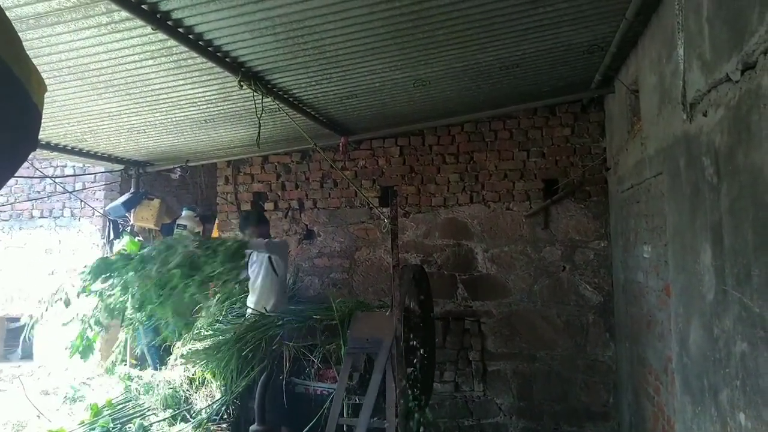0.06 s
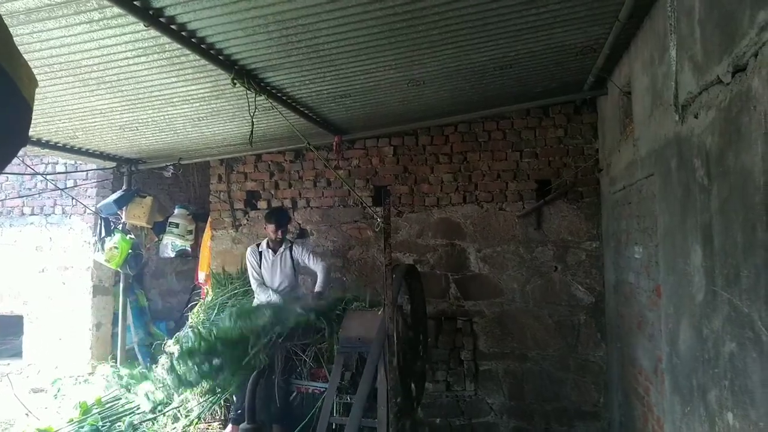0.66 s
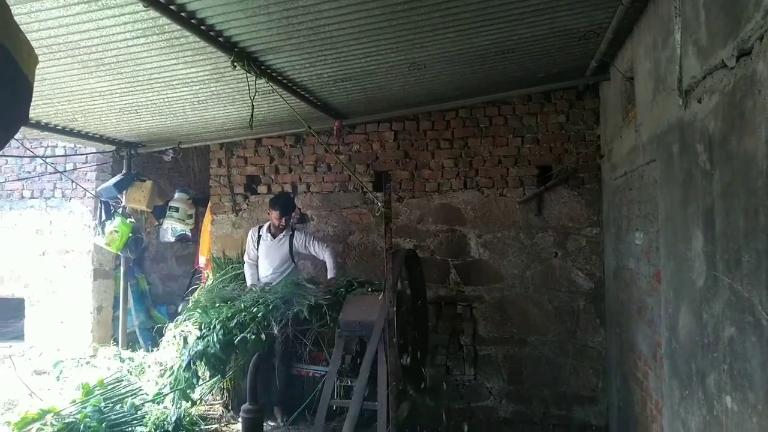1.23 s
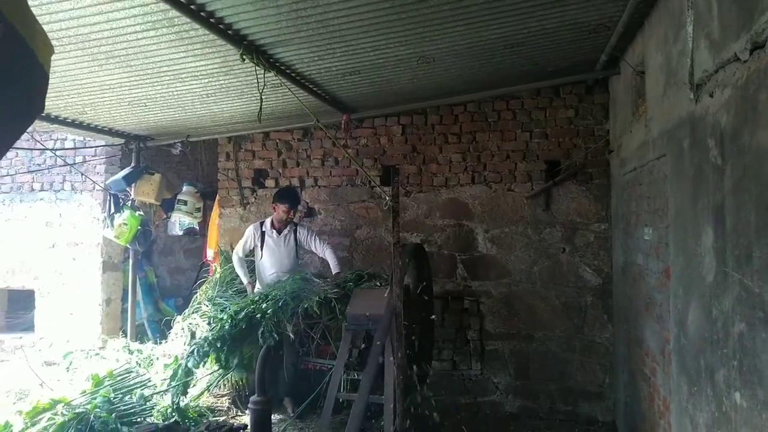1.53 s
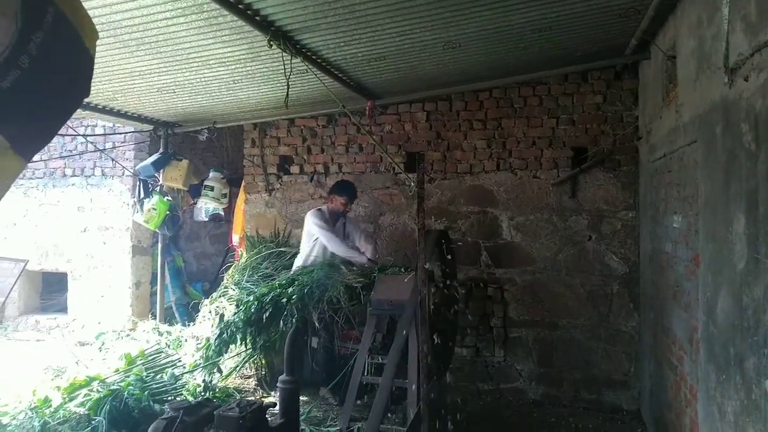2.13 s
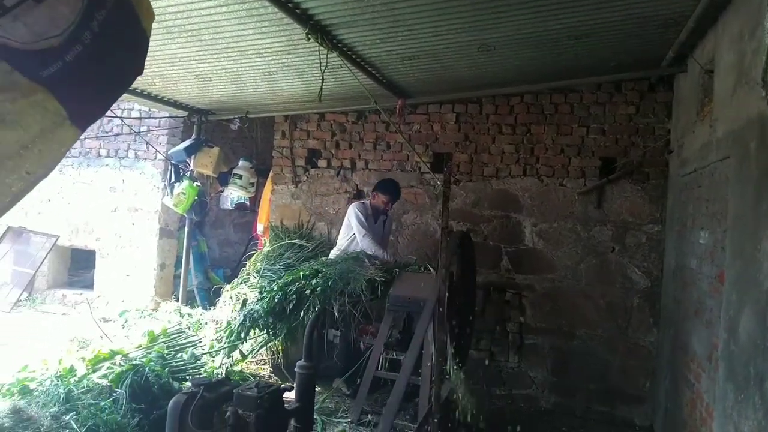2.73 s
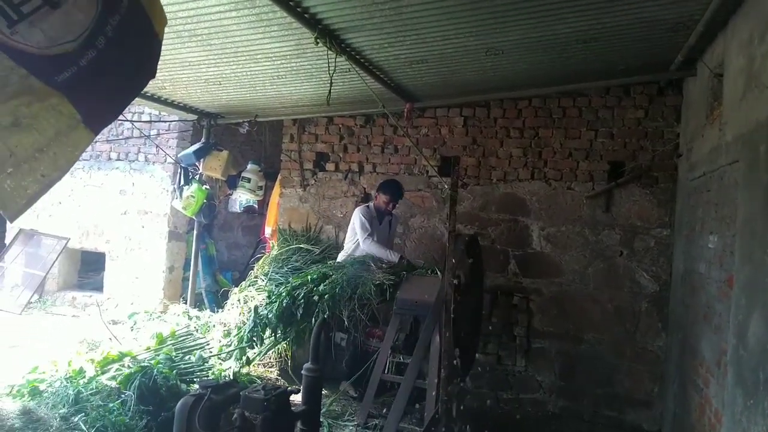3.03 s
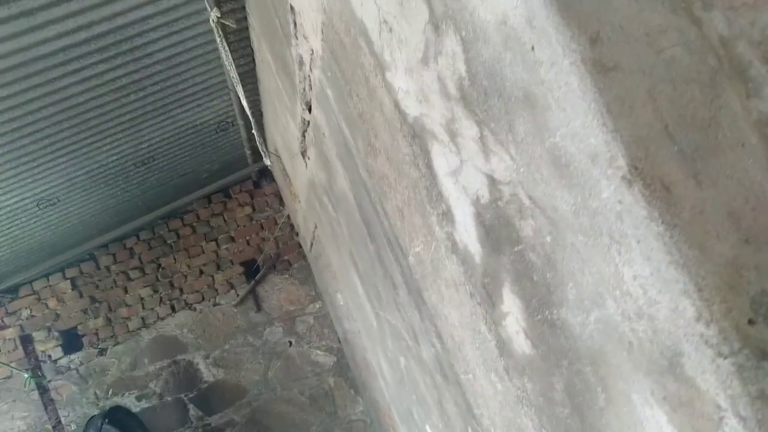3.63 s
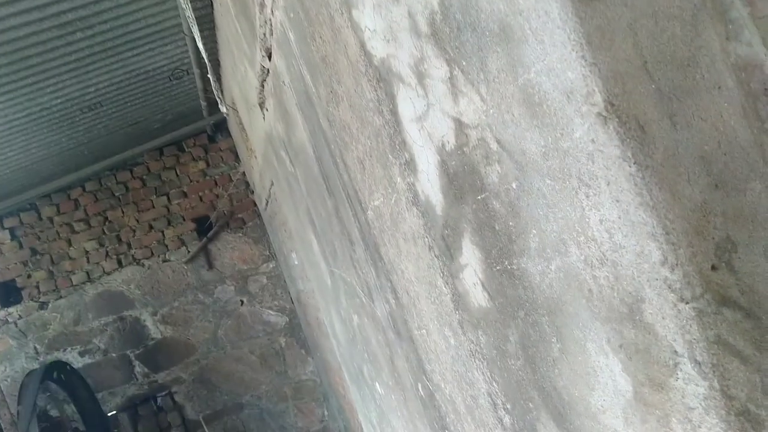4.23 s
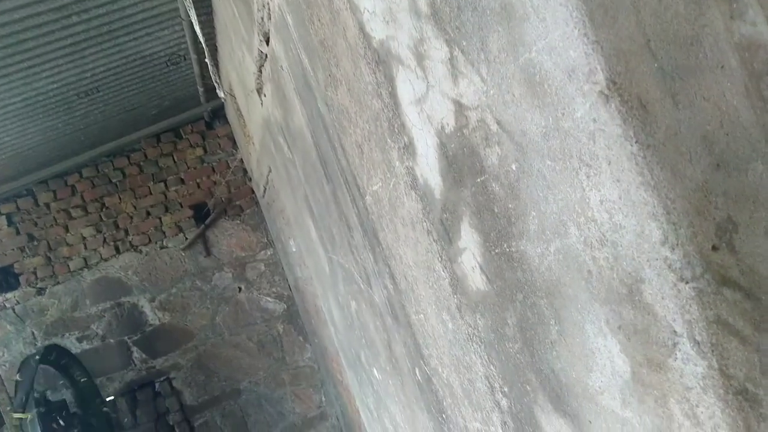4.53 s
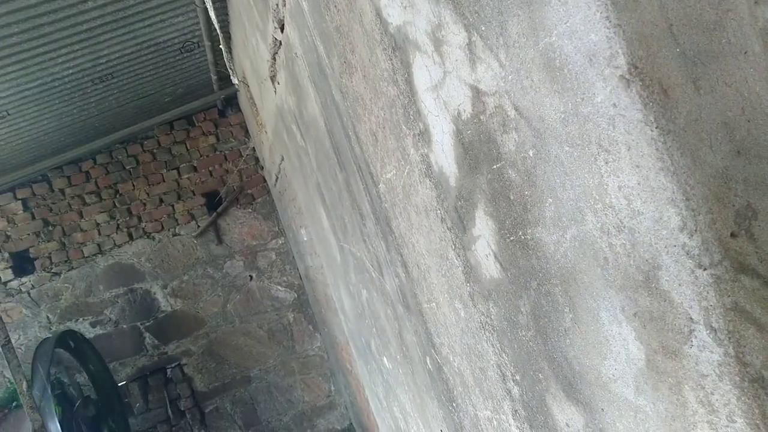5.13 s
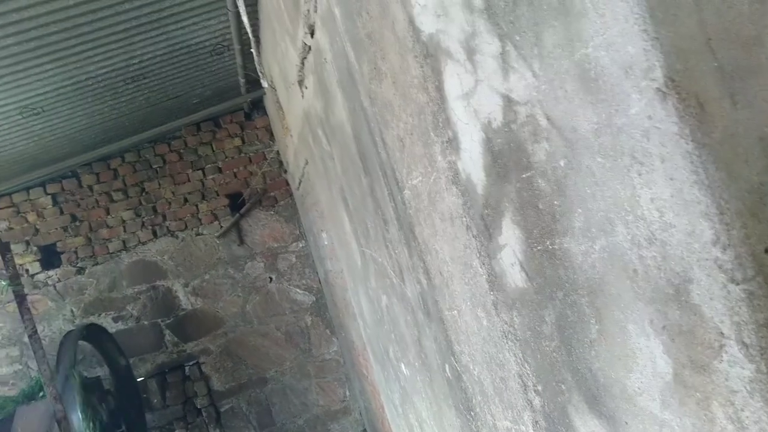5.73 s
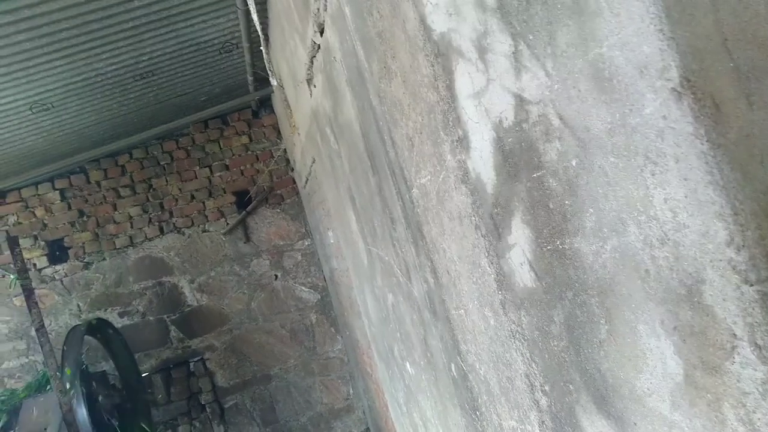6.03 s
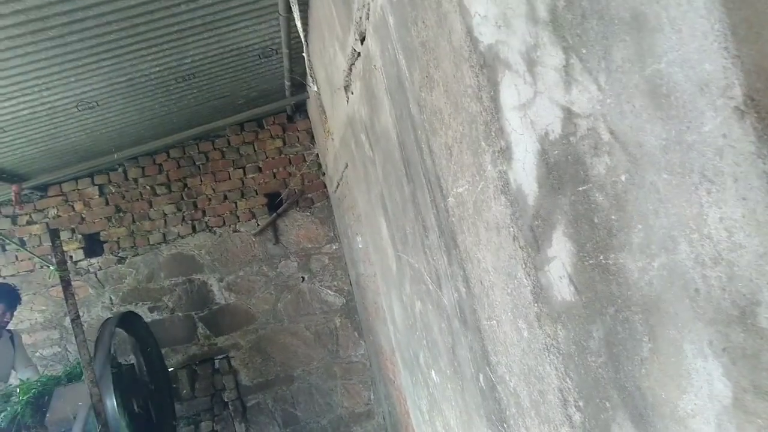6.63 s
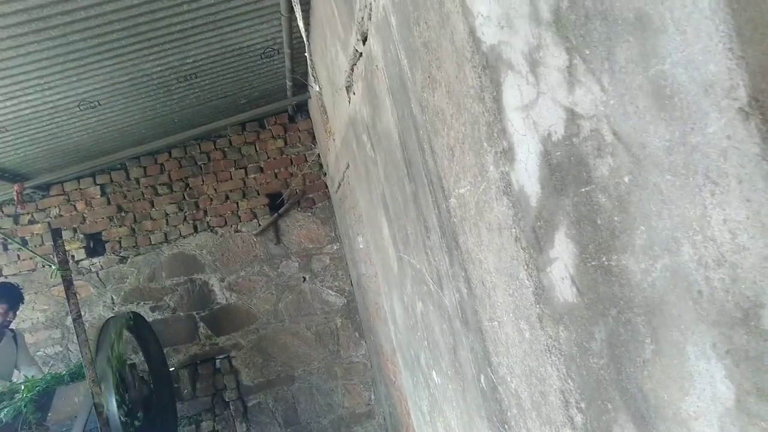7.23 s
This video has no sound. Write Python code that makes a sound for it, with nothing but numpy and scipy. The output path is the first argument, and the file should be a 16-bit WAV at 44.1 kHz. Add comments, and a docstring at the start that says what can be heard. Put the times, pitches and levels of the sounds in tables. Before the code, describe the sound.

A small single-cylinder engine runs throughout under a tin roof, thumping steadily about nine times a second. Each stroke gives a hollow knock and a metallic clatter over a low rumble and a faint ring of iron. It drives a fodder cutter whose knives bite through green stalks about twice a second, each bite a crackling crunch with a dull thud. In the first second or so, leaves slide into the trough in a few short, bright swishes. Sharp cracks come at about 1.1 and 1.8 seconds. At 3.3 seconds the stereo microphone jumps from facing the machine to beside a wall, and the chug becomes rounder with brighter ticks. Two hard firings crack at about 3.8 and 4.2 seconds. From the change onward, the drive belt's joint slaps about once a second, each slap followed by a small jangle, until the end at about 7.5 seconds.

```python
"""A steady thump, about nine a second: a single-cylinder four-stroke engine under a tin roof, driving a
chaff cutter by a flat belt. Every stroke rings pipes and casing and shakes loose a clatter; flywheel
knives crunch through green stalks. The stereo microphone faces the machine at first, then is suddenly
beside the side wall, where the chug is rounder and the belt's joint slaps round about once a second."""
import sys
import numpy as np
from scipy import signal
from scipy.fft import rfft, irfft, next_fast_len
from scipy.io import wavfile

SR = 44100
rng = np.random.default_rng(int(sys.argv[2]) if len(sys.argv) > 2 else 0)


def store_pcm(level_fs):
    """Save levels as 16-bit WAV."""
    pcm = np.round(np.clip(level_fs, -1, 1) * 32767).astype(np.int16)
    wavfile.write(sys.argv[1], SR, np.atleast_2d(pcm).T)


N = 325017

# The governed engine's pace, from the front and from the wall.
# Each holds: time of one firing in seconds, period in seconds, relative drift of the period per firing.
FRONT_PACE = (.096, .1143, .00042)
WALL_PACE = (3.3233, .11315, -.00011)
# Pipe and casing modes rung by intake, firing and exhaust.
# Each row: start in ms after the firing, pitch in Hz, peak level in dB, swell in ms.
FRONT_MODES = [(-36.7, 75.0, -16.1, 19.5), (-36.7, 86.0, -21.1, 2.3), (-36.7, 145.0, -22.2, 23.2),
               (-36.7, 212.0, -17.7, 7.3), (-36.7, 365.0, -21.0, 1.9), (-36.7, 1443.0, -35.5, 3.7),
               (-2.2, 47.0, -36.7, 58.9), (-2.2, 224.0, -18.8, 4.3), (-2.2, 568.0, -15.0, 3.7),
               (-2.2, 1016.0, -19, 3.3), (-2.2, 1345.0, -26.6, 6.6), (8.9, 84.0, -22.5, 27.6),
               (8.9, 118.0, -16.5, 3.4), (8.9, 209.0, -28.0, 58.9), (8.9, 208.0, -14.4, 8.0),
               (8.9, 235.0, -31.9, 33.9), (8.9, 327.0, -23.6, 21.2), (8.9, 425.0, -35.1, 22.7),
               (8.9, 537.0, -37, 49.4), (8.9, 825.0, -30.8, 14.3), (8.9, 961, -28.8, 40),
               (8.9, 997.0, -38.7, 58.9)]
WALL_MODES = [(-39.4, 73, -17.7, 31), (-39.4, 134.0, -26.1, 30.9), (-39.4, 164.0, -26.5, 37.0),
              (-39.4, 210.0, -25.3, 45.4), (-2.1, 52, -37, 30), (-2.1, 213.0, -13.1, 10.0),
              (-2.1, 261.0, -17.6, 9.9), (-2.1, 341.0, -20.0, 7.1), (-2.1, 720.0, -22.5, 2.4),
              (-2.1, 928.0, -22, 2.9), (9.8, 89.5, -21.9, 58), (9.8, 133.0, -29.1, 21.4),
              (9.8, 151.0, -26, 39.5), (9.8, 200.0, -9.4, 1.9), (9.8, 288.0, -33.2, 44.7),
              (9.8, 308.0, -25.2, 23.4), (9.8, 356.0, -33.2, 16.7), (9.8, 386.0, -35.2, 58.9),
              (9.8, 521.0, -26.7, 6.2), (9.8, 540.0, -42.0, 58.9), (9.8, 864.0, -33.8, 9.7),
              (9.8, 946.0, -27.8, 36.0), (9.8, 982.0, -32.5, 32.0)]
# Blows of valve gear and piston. Each row: start in ms after the firing, rattle in dB, hiss in dB,
# decay in ms, ring pitch in Hz, ring level in dB.
FRONT_BLOWS = [(-34, -27.5, -31.5, 39, 1383, -27), (-3, -23.5, -27.5, 22.5, 1920, -31),
               (21, -43, -30, 23, 790, -38), (58.5, -23.5, -32.5, 20, 5340, -34.5)]
WALL_BLOWS = [(-35.5, -31, -32, 26.5, 2320, -26.5), (-2.5, -22, -25, 15.5, 2350, -22),
              (22.5, -42.5, -36, 39, 2150, -32), (60, -18.5, -36.5, 7.9, 2370, -20.5),
              (65.5, -22.5, -48, 8.4, 1850, -39)]
# Sharp cracks: a stalk snapping, then three hard firings. Each row: start in seconds, level in dB.
CRACKS = [(1.126, -23), (1.786, -27), (3.776, -19.5), (4.23, -17.5)]
# Knife bites. Each row: peak time, rise and fall in seconds, then crunch, thud and crackle in dB.
BITES = [(.135, .022, .04, -28, -36, -28), (0.207, .07, .05, -24.5, -34, -31),
         (0.705, .035, .023, -22, -27, -32), (1.186, .09, .02, -24, -31, -31),
         (1.655, .034, .036, -21.5, -31, -30), (2.123, .012, .04, -22, -31, -24.5),
         (2.622, .06, .039, -26, -32, -32), (3.052, .02, .035, -28, -31, -29),
         (3.127, .065, .04, -25, -32, -30), (3.647, .03, .042, -23.5, -25, -31),
         (4.14, .047, .045, -22, -23.5, -32), (4.608, .042, .04, -23, -25, -31),
         (5.067, .018, .052, -21, -22, -30), (5.547, .027, .035, -20.5, -25.5, -30),
         (6.028, .036, .038, -22.5, -27, -28.5), (6.494, .033, .045, -24.5, -25.5, -32),
         (6.98, .024, .04, -21.5, -25.5, -31)]
# Laps of the belt's joint. Each row: start in seconds, then snap, jangle and ring in dB.
BELT_LAPS = [(3.26, -35, -26, -27), (4.2548, -17, -38, -23.5), (5.2388, -18, -24, -22),
             (6.225, -13.5, -25, -22), (7.206, -18, -27, -22.5)]
# The belt fastener's modes. Each row: pitch in Hz, relative level in dB, decay in seconds.
FASTENER_MODES = [(3030, -4, .012), (3430, -3, .014), (4130, -5, .018)]
# Leaves landing in the trough. Each row: peak time in seconds, level in dB, half width in seconds.
SWISHES = [(0.053, -24, 0.01), (0.363, -26.5, 0.012), (1.051, -27, 0.013), (1.137, -36, .008)]

# Colours of the noises at the microphone. Each row: frequency in Hz, relative spectral density in dB.
FRONT_RATTLE = [(200, 1), (350, -1.5), (480, -7), (600, -1.5), (760, -8), (1000, 1.5), (1170, -5),
                (1380, -4), (2100, -7.5), (3400, -13), (7000, -17.5), (9000, -65)]
WALL_RATTLE = [(210, -9), (350, -6.5), (382, -0.5), (510, -14), (536, -7), (615, -10.5), (724, -0.5),
               (781, -8.5), (966, -8), (1310, -6), (1950, -12.5), (2500, -13), (3560, -16), (7000, -22.5),
               (9100, -58), (15400, -120)]
HISS = [(1500, -4), (3500, 6.5), (5500, 2.5), (10000, 5), (15500, 2.5)]
CRACK_COLOUR = [(300, -28), (800, -8), (2000, 10), (3200, 1), (6000, -6), (15000, -26)]
STALK_CRUNCH = [(300, -22), (800, -9), (1250, -3), (1550, 3), (1750, -2), (1980, 2), (2800, -7),
                (5200, -13), (15500, -24)]
TROUGH_THUD = [(220, -22), (360, 3), (480, 0), (700, 4), (1000, -3), (2000, -16), (6000, -32)]
FIBRE_CRACKLE = [(800, -15), (2200, -6), (3500, 5.5), (5200, 6), (9500, 0), (15500, -5)]
BELT_SNAP = [(1000, -30), (3000, 13), (6000, 4.5), (11000, 4), (15500, 0)]
FASTENER_JANGLE = [(800, 7), (2200, 6), (3200, 5), (4200, -13), (5500, 10), (10000, 7), (15500, -8)]
FRAME_RUMBLE = [(20, -14), (45, -9), (75, 2), (110, -4), (220, -7), (450, -8), (800, -19), (2000, -52)]
FRAME_DRONE = [(250, -25), (430, 0), (650, -1), (900, -1), (1400, -9), (2000, -25)]

# How alike the microphone's two ports hear the shed. Each row: frequency in Hz, correlation from 0 to 1.
PORT_LIKENESS = [(120, 0.98), (260, 0.89), (520, 0.93), (1000, 0.48), (2200, 0.13), (5000, 0.036),
                 (10000, 0.042)]
# The ports' difference in colour. Each row: frequency in Hz, left minus right in dB.
PORT_BALANCE = [(100, 0.24), (500, 0.5), (1100, 1), (2200, 3.5), (4500, -2), (8000, 0), (12500, 3)]


def engine_in_front():
    """Microphone head on to the engine: a hollow knock at each firing, clatter and the frame's rumble."""
    beats = firings(*FRONT_PACE)
    body = thump(beats, FRONT_MODES, jitter_s=.00012, width=.4)
    steady = flywheel_ring(hz=985, db=-36.5) + frame_rumble() + frame_drone(beats, db=-37)
    metal = clatter(beats, FRONT_BLOWS, FRONT_RATTLE, bed_db=-27.5, hiss_bed_db=-41.5,
                    scatter_db=1.9, grit_db=.1, q=3.7, rise_s=.0008)
    return body + steady + late_left(metal, lag_s=.00017)


def engine_by_wall():
    """Microphone beside the wall: the same engine with a rounder chug and brighter ticks."""
    beats = firings(*WALL_PACE)
    body = thump(beats, WALL_MODES, jitter_s=.00014, width=.46)
    steady = flywheel_ring(hz=972, db=-34) + frame_rumble() + frame_drone(beats, db=-38)
    metal = clatter(beats, WALL_BLOWS, WALL_RATTLE, bed_db=-28.5, hiss_bed_db=-37,
                    scatter_db=1, grit_db=.4, q=3.53, rise_s=.0027)
    return body + steady + late_left(metal, lag_s=.00037)


def firings(start_s, period_s, drift):
    """Firing times in seconds; the period drifts slowly."""
    count = np.arange(-2, N / SR / period_s)
    return start_s + period_s * count * (1 + drift * count / 2)


def thump(beats, modes, jitter_s, width, scatter_db=.45):
    """Each stroke swells and fades in the modes of pipes and casing, never quite alike."""
    out, t = np.zeros((2, N)), np.arange(SR // 4) / SR
    for ms, hz, db, swell_ms in modes:
        age = t / (swell_ms / 1000)
        envelope = amp(db) * age * np.exp((1 - age ** 2) / 2)
        mid = envelope * np.sin(2 * np.pi * hz * t)
        side = envelope * np.cos(2 * np.pi * hz * t) * width * hz / 1000
        ring = np.array([mid - side, mid + side])  # higher modes lag more in phase on the left
        for s in beats:
            force = amp(scatter_db * rng.standard_normal())
            add(out, force * ring, s + ms / 1000 + jitter_s * rng.standard_normal())
    return out


def clatter(beats, blows, spectrum, bed_db, hiss_bed_db, scatter_db, grit_db, q, rise_s, repeat=.4):
    """Metal blows echo in the shed over a bed of gear noise; a share of each echo repeats every cycle."""
    out, t = np.zeros((2, N)), np.arange(SR // 8) / SR
    rattle_power = np.full(N, amp(bed_db) ** 2)
    hiss_power = np.full(N, amp(hiss_bed_db) ** 2)
    for ms, rattle_db, hiss_db, decay_ms, ring_hz, ring_db in blows:
        envelope = np.exp(-t * 1000 / decay_ms) * (1 - np.exp(-t / rise_s))
        echo = amp(rattle_db) * noise(spectrum, len(t)) + amp(ring_db) * resonance(ring_hz, len(t), q)
        shake = np.zeros(N)
        for s in beats + ms / 1000:
            blow = amp(scatter_db * rng.standard_normal()) * envelope
            add(out, np.sqrt(repeat) * blow * echo, s)
            add(shake, blow, s)
        # the rest is fresh noise that follows the blows
        out += np.sqrt(1 - repeat) * amp(ring_db) * shake * resonance(ring_hz, N, q)
        rattle_power += (1 - repeat) * (amp(rattle_db) * shake) ** 2
        hiss_power += (amp(hiss_db) * shake) ** 2
    rattle = np.sqrt(rattle_power) * noise(spectrum, N, grit_db)
    hiss = np.sqrt(hiss_power) * noise(HISS, N, grit_db)
    return out + rattle + hiss


def sharp_cracks(crack_s=.0038, echo_s=.038, echo_db=-11):
    """Sharp cracks with a brief echo: a stalk snapping, then three hard firings."""
    out, t = np.zeros((2, N)), np.arange(SR // 8) / SR
    for s, db in CRACKS:
        envelope = np.exp(-t / crack_s) + amp(echo_db) * np.exp(-t / echo_s)
        add(out, amp(db) * envelope * noise(CRACK_COLOUR, len(t)), s)
    return out


def knives(snaps_per_s=260, snap_s=.0031, snap_share=.26, thud_lag_s=.007):
    """Each knife bites a bundle: stalks snap up to a sharp peak, and the trough thuds just after."""
    t, power = np.arange(N) / SR, np.zeros((3, N))
    for s, rise, fall, *levels in BITES:
        distance = np.abs(t - s) / np.where(t < s, rise, fall)
        outline = np.exp(-2 * np.minimum(distance, 10) ** 1.3)  # between a cusp (1) and a bell (2)
        power += np.outer(amp(levels) ** 2, outline)
    impulses = (rng.random(N) < snaps_per_s / SR) * rng.uniform(.3, 1, N)
    snaps = signal.lfilter([1], [1, -np.exp(-1 / (snap_s * SR))], impulses)
    breaking = np.sqrt(1 - snap_share + snap_share * unit(snaps) ** 2)
    crunch_gain, thud_gain, crackle_gain = np.sqrt(power)
    crunch = crunch_gain * noise(STALK_CRUNCH, N, grit_db=-1)
    thud = np.interp(t - thud_lag_s, t, thud_gain) * noise(TROUGH_THUD, N)
    crackle = crackle_gain * noise(FIBRE_CRACKLE, N, grit_db=5.5)
    return breaking * (crunch + thud + crackle)


def belt(snap_s=.0014, echo_s=.063, echo_db=-13,
         jangle_after_s=.079, jangle_s=.02, bounce_s=.012, bounce_db=-4):
    """The joint snaps on the pulley and echoes; further round, its loose fastener bounces and jangles."""
    out, t = np.zeros((2, N)), np.arange(SR // 4) / SR
    for s, snap_db, jangle_db, ring_db in BELT_LAPS:
        envelope = np.exp(-t / snap_s) + amp(echo_db) * np.exp(-t / echo_s)
        add(out, amp(snap_db) * envelope * noise(BELT_SNAP, len(t)), s)
        for bounce in range(3):
            ring = sum(amp(ring_db + db) * np.exp(-t / decay_s) * resonance(hz, len(t), q=9)
                       for hz, db, decay_s in FASTENER_MODES)
            jangle = amp(jangle_db) * np.exp(-t / jangle_s) * noise(FASTENER_JANGLE, len(t))
            add(out, amp(bounce * bounce_db) * (jangle + ring), s + jangle_after_s + bounce * bounce_s)
    return out


def leaves():
    """The fresh bundle slides into the feed trough in a few bright swishes."""
    out, t = np.zeros((2, N)), np.arange(-SR // 8, SR // 8) / SR
    for s, db, half_width_s in SWISHES:
        bell = np.exp(-(t / half_width_s) ** 2 / 2)
        add(out, amp(db) * bell * noise(HISS, len(t), grit_db=4.5), s + t[0])
    return out


def flywheel_ring(hz, db):
    """The shaking keeps the iron flywheel singing in one narrow resonance."""
    return amp(db) * resonance(hz, N, q=12)


def frame_rumble(db=-34.5):
    """The frame rumbles low and steady under the strokes."""
    return amp(db) * noise(FRAME_RUMBLE, N)


def frame_drone(beats, db):
    """Every cycle shakes the frame in the same way; its drone fills the shed between beats."""
    out = np.zeros((2, N))
    size = int(np.diff(beats).mean() * SR) * 2  # two periods, so the swells overlap
    swell = noise(FRAME_DRONE, size) * np.sin(np.pi * np.arange(size) / size)
    for s in beats:
        add(out, amp(db) * swell, s)
    return out


def noise(spectrum, size, grit_db=0):
    """Coloured stereo noise of rms 1, diffuse in the treble; grit breaks it into millisecond grains."""
    grain_starts = np.arange(0, size, 44)
    grains = np.interp(np.arange(size), grain_starts, rng.standard_normal(len(grain_starts)))
    white = rng.standard_normal((2, size)) * amp(grit_db * grains)
    shares = lambda hz: np.sqrt(1 + np.outer([1, -1], along(PORT_LIKENESS, hz)))
    mid, side = filtered(white, lambda hz: amp(along(spectrum, hz)) * shares(hz))
    return unit(np.array([mid + side, mid - side]))


def resonance(hz, size, q):
    """Stereo noise of rms 1 ringing around one pitch."""
    white = rng.standard_normal((2, size))
    return unit(filtered(white, lambda f: 1 / (1 + (2 * q * (f - hz) / hz) ** 2)))


def late_left(x, lag_s):
    """Sound from the right reaches the microphone's left port later."""
    return filtered(x, lambda hz: np.exp(np.outer([-1j, 1j], np.pi * hz * lag_s)))


def filtered(x, response):
    """Pass x through a response given as a function of Hz."""
    size = x.shape[-1]
    padded = next_fast_len(size + 8192)
    hz = np.fft.rfftfreq(padded, 1 / SR)
    return irfft(rfft(x, padded) * response(hz), padded)[..., :size]


def along(points, hz):
    """Read (Hz, value) points on a log frequency axis."""
    freqs, values = np.transpose(points)
    return np.interp(np.log(hz + 1), np.log(freqs + 1), values)


def add(track, sound, s):
    """Mix a sound into the track at s seconds."""
    start = int(round(s * SR))
    a, b = max(start, 0), min(start + sound.shape[-1], N)
    if b > a:
        track[..., a:b] += sound[..., a - start:b - start]


def amp(db):
    """Decibels to gain."""
    return np.exp(np.asarray(db) * np.log(10) / 20)


def unit(x):
    """Scale to rms 1."""
    return x / np.sqrt(np.mean(x ** 2) + 1e-20)


def scene(move_s=3.293, crossfade_s=.004):
    """The machine from the front, then from the side wall, where the belt is heard too."""
    at_wall = np.clip((np.arange(N) / SR - move_s) / crossfade_s, 0, 1)
    machine = (1 - at_wall) * engine_in_front() + at_wall * (engine_by_wall() + belt())
    return machine + sharp_cracks() + knives() + leaves()


def record(dry, notch_hz=7950, notch_half_width_hz=800, notch_db=-17, low_cut_hz=42, top_hz=15650):
    """The microphone's ports differ in colour, have a deep notch and lose the lowest bass and the top."""
    ports = lambda hz: amp(np.outer([.5, -.5], along(PORT_BALANCE, hz)))
    low_cut = lambda hz: hz ** 2 / np.hypot(hz ** 2, low_cut_hz ** 2)
    notch = lambda hz: amp(notch_db / (1 + ((hz - notch_hz) / notch_half_width_hz) ** 2))
    return filtered(dry, lambda hz: ports(hz) * low_cut(hz) * notch(hz) * (hz < top_hz))


dry = scene()
out = record(dry)
store_pcm(out)
```